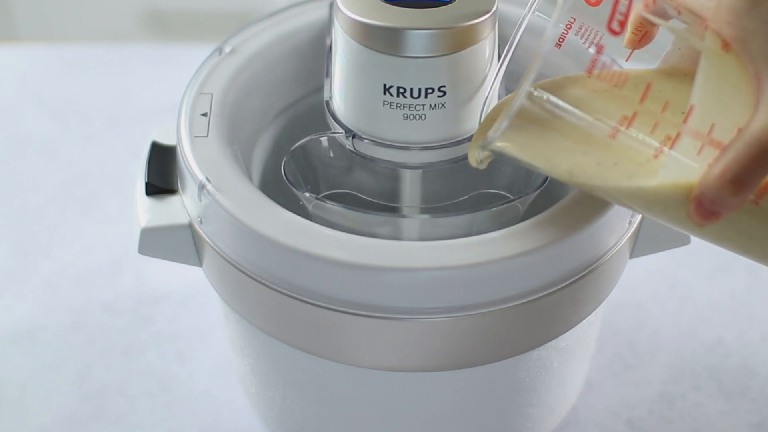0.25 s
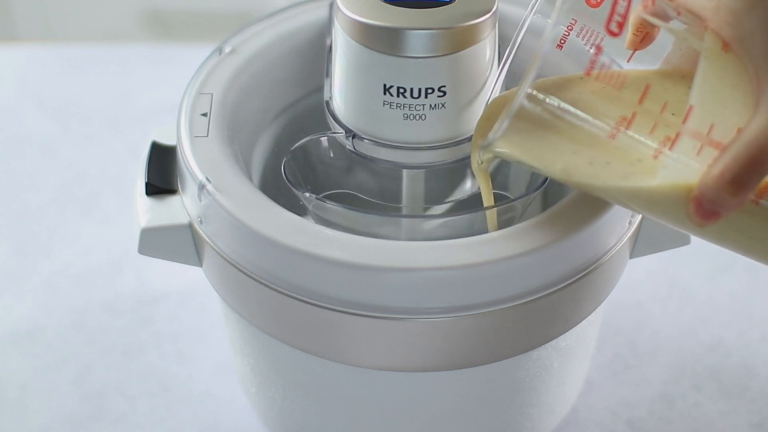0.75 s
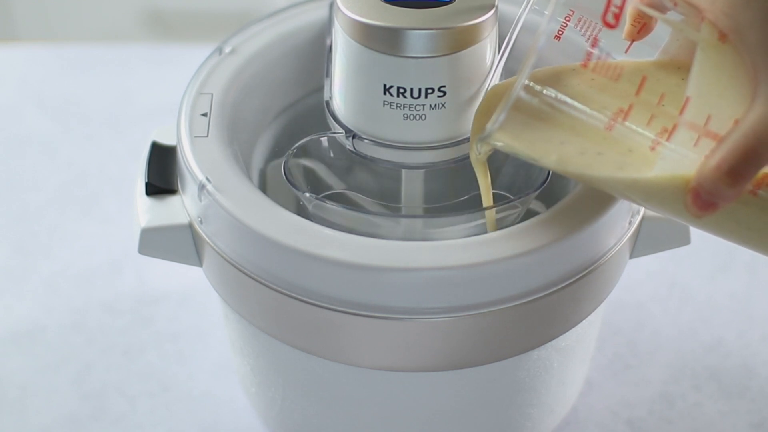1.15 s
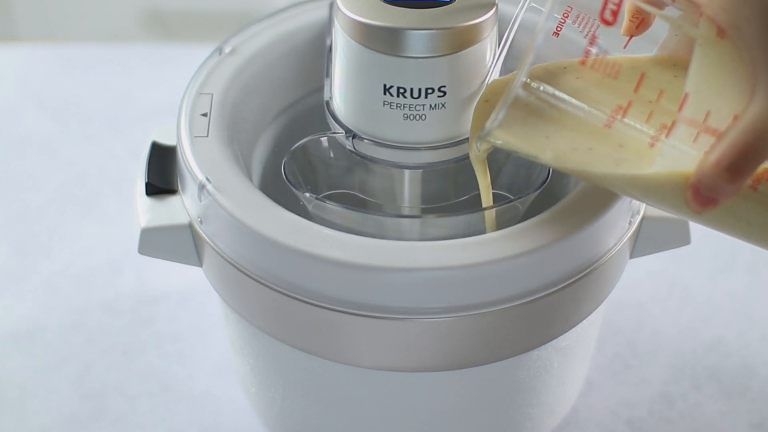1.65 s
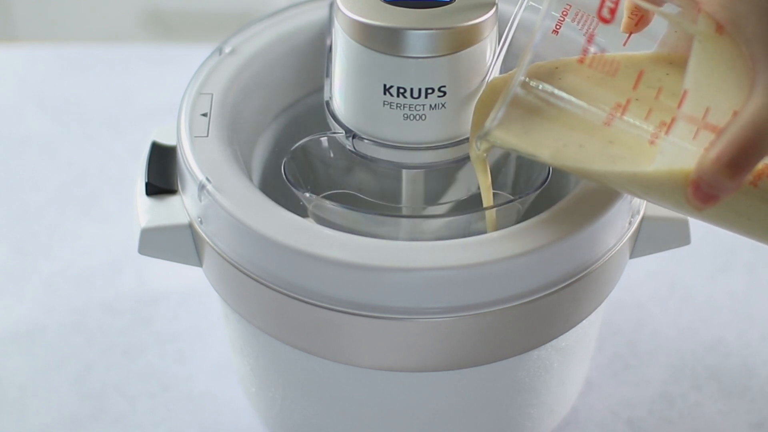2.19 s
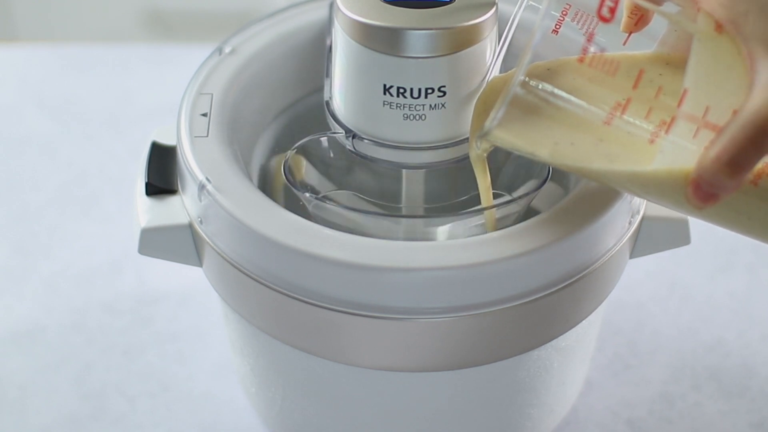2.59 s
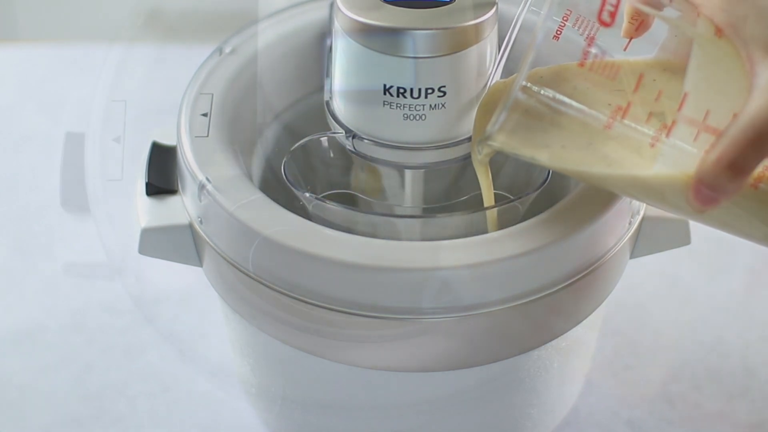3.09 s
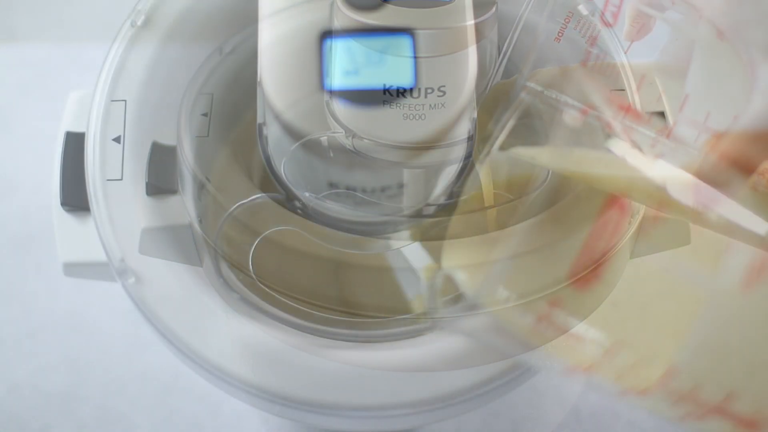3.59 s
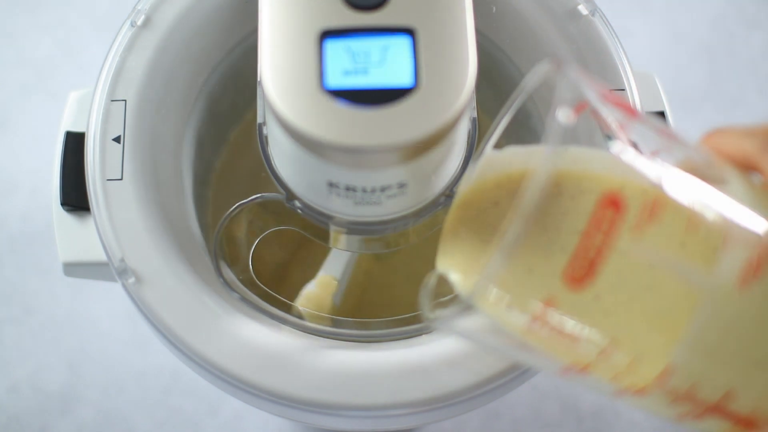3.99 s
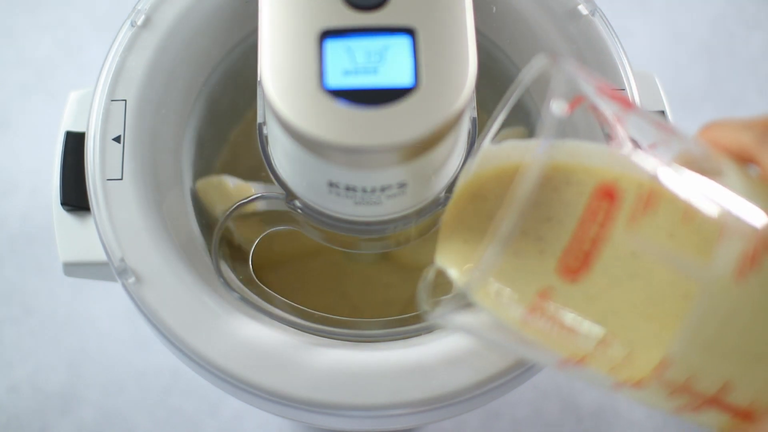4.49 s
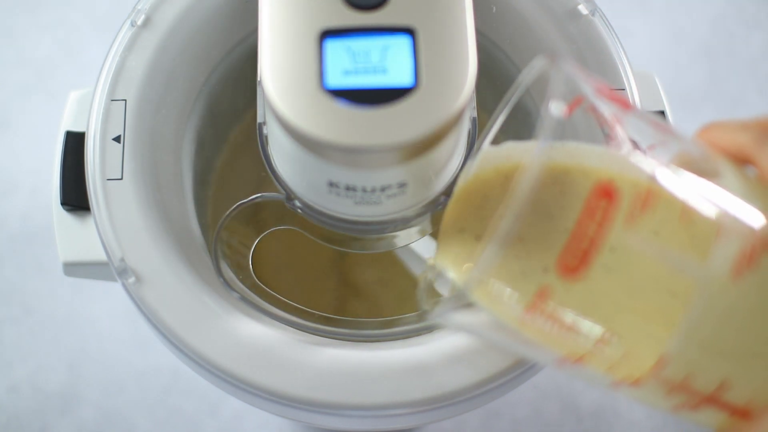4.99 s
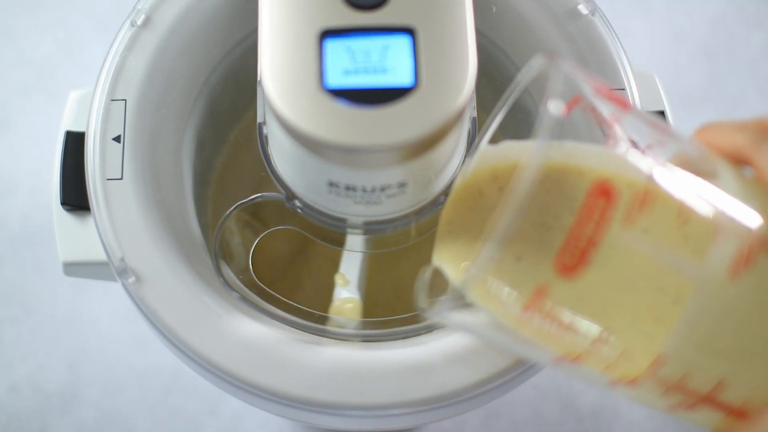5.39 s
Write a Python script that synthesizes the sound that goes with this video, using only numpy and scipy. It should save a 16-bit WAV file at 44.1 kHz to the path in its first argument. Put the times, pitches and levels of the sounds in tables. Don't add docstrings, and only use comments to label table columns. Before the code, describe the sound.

An electric ice cream maker is already running and continues to the end, heard close in mono in a quiet kitchen. A steady hum, strongest around 300 Hz, sits under a grainy plastic gear clatter whose uneven pattern repeats ten times a second. A dull bump comes at 0.5 s; around 1.3 to 1.5 s small lid or jug ticks and a soft table bump bring a brief low buzz. From about 2.1 s the main hum gradually weakens, until a knock at 2.95 s restores it with a slightly different tone. A firmer thud near 3.6 s accompanies a quick change to a quieter moment of the same machine, with softer hum, rounder low knocks each turn and faint deep rumble. Sharp little ticks stand out at 4.2, 4.4, 4.7 and 4.9 s, then a cluster around 5.4 to 5.5 s. After 4.6 s the low knocks soften further. No pouring splash is distinct.

```python
import sys
import numpy as np
from scipy import signal
from scipy.fft import rfft, irfft, next_fast_len
from scipy.io import wavfile
from scipy.ndimage import uniform_filter1d

SR = 44100
rng = np.random.default_rng(int(sys.argv[2]) if len(sys.argv) > 2 else 0)


def magnitude_from_level(level_db):
    exponent = np.asarray(level_db, float) / 20
    return 10 ** exponent


def wrap_up_sound(samples):
    columns = np.atleast_2d(samples).T
    tamed = np.clip(columns, -1, 1)
    steps = np.round(tamed * 32767).astype(np.int16)
    wavfile.write(sys.argv[1], SR, steps)


N = 249165
MAINS_HZ, LATER_MAINS_HZ, POLE_PAIRS = 50, 49.97, 5
SHIFT_S = 2.955
LEAN_S = 1.4

# hz, first_db, shifted_db (after the housing shifts), later_db
HUM_LINES = [(200.0, -56.5, -55.5, -80), (250.0, -60, -51, -66), (300.0, -35.5, -33.5, -43.0),
             (350.0, -51.5, -41.5, -62.5), (400.0, -47.5, -54.5, -61), (500.0, -48, -47.5, -54),
             (550.0, -45.5, -46.5, -55), (600.0, -50.5, -47.5, -62), (650.0, -58.5, -54, -63),
             (700.0, -56, -60.5, -75.5), (750.0, -56.5, -64, -62.5), (850.0, -70, -60.5, -70),
             (900.0, -57, -57, -62.5), (1050.0, -61, -57, -84.5), (1100.0, -54, -71, -67),
             (1150.0, -60, -62.5, -63), (1200.0, -67.5, -78, -66.5), (1400.0, -58.5, -62.5, -82),
             (1500.0, -58, -59.5, -69.5), (1550.0, -65, -58, -72), (1600.0, -61.5, -65, -83),
             (1700.0, -64.5, -69.5, -73), (2050.0, -65.5, -79, -67), (2150.0, -62, -58, -81.5),
             (2250.0, -62.5, -70.5, -80), (2300.0, -73.5, -85, -82.5), (2350.0, -63, -69.5, -77.5),
             (2450.0, -62, -60.5, -68.5), (2500.0, -69.5, -68, -82), (2650.0, -65.5, -67.5, -74.5)]
# hz, first_db, later_db
CLATTER_COLOUR = [(120, -20, -27), (216, -3, -12), (314, 9, 12.5), (370, 9, 8), (467, 4, 8), (557, 4, 3.5),
                  (730, 0, -8.5), (1000, -3.5, -4.5), (1120, -3.5, -4.5), (1300, -3.5, -3.5),
                  (1570, -6, -6), (1800, -8, -1.5), (2100, -6.5, -4), (2320, -6.5, -9), (2500, -6, -6),
                  (2950, -16, -19.5), (3600, -25.5, -20), (4170, -21, -17.5), (4680, -31, -34),
                  (5500, -37, -30.5), (7800, -49.5, -37.5), (10000, -70, -47.5), (15000, -87.5, -57)]
# start_s, peak_db, pitch_hz, t60_s
TABLE_BUMPS = [(.48, -46.5, 70, 0.18), (0.48, -35, 422, 0.12), (1.365, -48, 150, .2), (1.5, -59, 60, .2),
               (2.33, -55, 65, 0.44), (.005, -64, 60, 0.24), (.01, -58, 119, .15), (1.1, -49, 290, .1),
               (1.1, -47, 280, 0.071), (2.589, -49, 149, 0.43), (2.7, -57, 83, 0.5), (3, -43.5, 850, 0.1),
               (2.2, -45, 480, .1), (3.5322, -40.5, 393, 0.21), (3.55, -44, 50, 0.25), (3.54, -46, 85, 0.2),
               (3.6162, -28, 410, 0.13), (2.975, -34, 495, .2), (5.3, -54, 72, .4), (3.87, -57, 75, .3),
               (4.08, -57, 75, .3), (4.95, -58, 80, .3), (4.62, -56, 70, 0.28), (4.4, -65, 50, .3),
               (2.3, -50.5, 130, 0.24), (4.422, -58, 76, 0.37)]


def walk(rate, count=1):
    k = int(SR / rate)
    steps = np.repeat(rng.standard_normal((count, N // k + 1)), k, axis=1)
    return 1.18 * uniform_filter1d(uniform_filter1d(steps, k), k)[:, :N]


def colour(x, hz, db):
    size = next_fast_len(N, True)
    f = np.fft.rfftfreq(size, 1 / SR)
    gain = magnitude_from_level(np.interp(np.log(f + 1), np.log(hz), db))
    return irfft(rfft(x, size) * gain, size)[:N]


def ring(hz, t60):
    t = np.arange(int(t60 * SR)) / SR
    blow = np.sin(np.pi / 2 * np.minimum(t * hz / 3, 1)) ** 2
    return blow * np.sin(2 * np.pi * hz * t) * np.exp(-np.log(1000) * t / t60)


def seat(t):
    # middle_s, depth_db, length_s
    slip_events = [(0.027, -1, 0.16), (0.391, -4.5, 0.027), (0.58, -6.5, 0.08), (0.736, -4, 0.018),
                   (1, -7, 0.016), (1.403, -5, 0.015), (2.053, -4, 0.067), (2.915, -7, 0.034),
                   (3.406, -10, 0.013), (3.508, -12, 0.007), (3.546, 2, .01), (3.568, -4, .01),
                   (3.587, -7, 0.012), (3.757, -9.5, 0.038), (4.78, -1.5, 0.15), (5.25, -0.5, 0.091)]
    slips = sum(db * np.exp(-((t - s) / length) ** 2) for s, db, length in slip_events)
    loose = -34 - 12.5 * np.maximum(t - 2.14, 0)
    seated = -33.5 + 1.5 * (t - SHIFT_S)
    boom_db = uniform_filter1d(np.where(t < SHIFT_S, loose, seated), size=300) + slips
    creep = np.clip(-84 + 19 * (t - 1.8), -84, -64.5)
    lean = 13 * (t > LEAN_S) * np.exp(-(np.maximum(t - LEAN_S, 0) / 0.32) ** 2)
    return boom_db, -41.5 + slips, creep + lean


def jolts(t):
    out = 0
    for s, db, hz, _ in TABLE_BUMPS:
        if hz > 200:
            swing = np.sin(2 * np.pi * 14 * (t - s)) * np.exp(-np.abs(t - s) / 0.062)
            out = out + magnitude_from_level(min(db, -35) + 36.0) * swing
    return out


def hum(mains_hz, line_db, throb, throb_ms, boom_db):
    t = np.arange(N) / SR
    wander, slip = walk(5, count=len(HUM_LINES)), walk(2.5, count=len(HUM_LINES))
    start = rng.standard_normal(len(HUM_LINES))
    jolt = jolts(t)
    turn_rate = 2 * np.pi * mains_hz / POLE_PAIRS
    out = 0
    for k, row in enumerate(HUM_LINES):
        hz = round(row[0] / MAINS_HZ) * mains_hz
        if abs(hz - 300) < 10:
            gain = magnitude_from_level(boom_db + 0.5 * wander[k])
        else:
            gain = magnitude_from_level(line_db[k] + 0.9 * (1 + hz / 1200) * wander[k])
        if hz > 1000:
            swing = np.cos(turn_rate * (t - 0.048) + 0.6 * start[k] + 0.3 * slip[k])
        else:
            swing = np.cos(turn_rate * (t - (throb_ms - 0.15 * (hz - 550)) / 1000))
        depth = 0.2 * (hz > 1000) + throb * np.exp(-((hz - 550) / 120) ** 2)
        late_s = 0.0046 if hz > 430 else -0.0022
        phase = 2 * np.pi * hz * (t - late_s)
        phase = phase - 1.5 * ((hz - 300) / MAINS_HZ) ** 2 * (hz < 430)
        phase += 4 * start[k] * (hz > 620) + 0.2 * start[k] * (1 + hz / 600)
        phase += 0.15 * slip[k] * (1 + hz / 900)
        phase += jolt * (hz < 450)
        out = out + np.sqrt(2) * gain * (1 + depth * swing) * np.cos(phase)
    return out


def each_turn(turn, memory):
    rows = rng.standard_normal((N // turn + 40, turn))
    held = signal.lfilter([np.sqrt(1 - memory ** 2)], [1, -memory], rows, axis=0)
    return held[39:].ravel()[:N]


def snaps(ms, turn_ms, moment):
    # first_middle_db, first_treble_db, later_middle_db, later_treble_db
    pole_pulls = [(4.6, 2.9, 2.7, 2.1), (9.7, 10, 8.8, 8), (10, 7, 6.6, 4.1), (9.8, 4, 4.8, 4),
                  (7, 6.6, 4.9, 8.4), (11.5, 1.9, 4.2, 6), (3.6, 1.8, 6.4, 4.3), (7.4, 2.1, 3.4, 7),
                  (4.8, 5.8, 5, 6.6), (4.6, 9, 3, 6.3)]
    first_pull_ms = 0.8 if moment else 8.3
    out = 0
    for k, row in enumerate(pole_pulls):
        late = ms - first_pull_ms - k * turn_ms / len(pole_pulls)
        late = (late + turn_ms / 2) % turn_ms - turn_ms / 2
        burst = np.exp(-(late / np.where(late < 0, 1.2, 2.2)) ** 2)
        out = out + np.outer(row[2 * moment:][:2], burst)
    return out - out.mean(axis=1, keepdims=True)


def tooth_clatter(turn, tooth_db, memory, surge, moment):
    # hz, share (0-1)
    fresh_share = [(30, 0.9), (200, 0.8), (350, 0.17), (2600, 0.32), (3800, 0.8), (5000, 1), (16000, 1)]
    # from_hz, to_hz, unevenness (0-1), first_surge_share, later_surge_share
    gear_parts = [
        (20, 440, 0.5, -0.45, 0.35),
        (480, 660, 0.3, 1.8, 0.35),
        (730, 1495, 0.25, -0.2, 0.3),
        (1529, 3170, 0.2, -0.8, 0.7),
        (3170, 3520, 0.4, 0.47, -0.18),
        (3790, 4380, 0.8, -0.85, -0.3),
        (4556, 4790, 0.7, -1.7, .3),
        (5030, 13000, 0.6, 0.085, 0.6),
    ]
    hz, share = np.transpose(fresh_share)
    share = np.clip(share, 0.01, 0.99)
    old = colour(each_turn(turn, min(memory, 0.99)), hz, 10 * np.log10(1 - share))
    new = colour(rng.standard_normal(N), hz, 10 * np.log10(share))
    housing = rng.standard_normal(2000) * np.exp(-np.arange(2000) / (0.0072 * SR))
    housing[0] = 14
    both = new + signal.fftconvolve(old, housing / np.sqrt(np.sum(housing ** 2)))[:N]
    from_ms, to_ms, surge_db = surge
    ms = np.arange(N) % turn / SR * 1000
    loaded = uniform_filter1d(1.0 * ((ms > from_ms) & (ms < to_ms)), 250) - 0.5
    snap_db = np.tile(snaps(ms[:turn], turn / SR * 1000, moment), N // turn + 1)[:, :N]
    snap_db = snap_db * (1 + 0.22 * walk(7, count=2))
    out = 0
    for lo_hz, hi_hz, uneven, *load in gear_parts:
        teeth = uniform_filter1d(each_turn(turn, 0.9), 130)
        level_db = uneven * tooth_db * teeth / teeth.std()
        lag = int(0.028 * SR) if 450 < lo_hz < 550 and moment == 0 else 0
        level_db = level_db + load[moment] * surge_db * np.roll(loaded, lag)
        if lo_hz > 700:
            level_db = level_db + (0.85 if lo_hz < 4900 else 0.65) * snap_db[int(lo_hz > 3100)]
        band = colour(both, [lo_hz / 1.15, lo_hz, hi_hz, hi_hz * 1.15], [-60, 0, 0, -60])
        out = out + magnitude_from_level(level_db) * band
    return out


def tooth_knocks(turn, knocks, knock_db):
    starts = np.arange(0, N, turn)
    force = walk(1.1, count=len(knocks))
    out = np.zeros(N)
    for (ms, hz, db, t60_ms), swell in zip(knocks, force):
        follow = 1.0 if hz < 600 else -0.25 * (1300 < hz < 2200)
        uneven_db = hz / 3000 * rng.standard_normal(len(starts))
        blows = np.zeros(N + turn)
        blows[starts + int(ms / 1000 * SR)] = magnitude_from_level(db + 1.5 * swell[starts] + uneven_db + knock_db[starts] * follow)
        out += signal.oaconvolve(blows, ring(hz, t60_ms / 1000))[:N]
    return out


def gears(mains_hz, colour_db, knocks, knock_db, memory, tooth_db, surge, moment):
    turn = round(SR * POLE_PAIRS / mains_hz)
    clatter = tooth_clatter(turn, tooth_db, memory, surge, moment)
    return colour(clatter, np.transpose(CLATTER_COLOUR)[0], colour_db) + tooth_knocks(turn, knocks, knock_db)


def pockets(x, t):
    # middle_s, length_s, pitch_hz, width_ratio, added_db (level of the added band relative to the clatter)
    custard_pockets = [(2.35, 0.26, 1100, 1.04, -1), (3.611, 0.027, 1350, 1.25, 3),
                       (4.65, 0.11, 1900, 1.14, -9), (4.45, 0.35, 1170, 1.06, 1),
                       (4.62, 0.016, 1960, 1.27, 0), (2.85, 0.28, 6100, 1.15, -2),
                       (2.3, 0.25, 3500, 1.08, -7), (4.93, 0.26, 1534, 1.1, 1), (5.35, 0.045, 1440, 1.1, 7),
                       (5.6, 0.055, 1500, 1.08, 2), (1.5, 0.39, 1350, 0.87, -1)]
    out = x
    for s, length, hz, wide, db in custard_pockets:
        edges = [hz / wide / 1.1, hz / wide, hz * wide, hz * wide * 1.2]
        band = colour(x, edges, [-38.5, -5.0, -3.0, -37.5])
        out = out + magnitude_from_level(db) * np.exp(-((t - s) / length) ** 2) * band
    return out


def table_buzz(t, buzz_db, drift_db, moved, later):
    second = np.sqrt(2) * magnitude_from_level(buzz_db * (1 - later) - 88 * later + 2.0 * drift_db)
    third = magnitude_from_level(-67.0 + 9.3 * moved * (1 - later))
    return second * np.cos(4 * np.pi * MAINS_HZ * t) + third * np.cos(6 * np.pi * MAINS_HZ * t)


def background(t, drift_db, later, enter):
    rumble = colour(rng.standard_normal(N), [12, 25, 80, 180, 400], [-21.5, 0.0, 2.5, 4.0, -43.5])
    still = (t > 0.52) & (t < LEAN_S)
    rumble_db = 1.7 * drift_db + uniform_filter1d(np.where(still, -87, -76), size=2000)
    traffic = colour(rng.standard_normal(N), [12, 22, 45, 90], [0.5, 25, 27.5, -31])
    hiss = magnitude_from_level(-96.5 + 3.5 * enter) * rng.standard_normal(N)
    return magnitude_from_level(rumble_db + 24.0) * rumble + magnitude_from_level(-73.5) * later * traffic + hiss


def hits(table, noisy):
    out = np.zeros(N + SR)
    t = np.arange(int(0.3 * SR)) / SR
    for s, db, hz, t60 in table:
        wide = signal.butter(3, [hz / 1.18, min(hz * 1.2, 0.45 * SR)], "bandpass", fs=SR, output="sos")
        splash = rng.standard_normal(len(t)) * np.exp(-np.log(1000) * t / (1.1 * t60))
        wash = signal.sosfilt(wide, splash)
        crack = np.diff(rng.standard_normal(len(t) + 1)) * np.exp(-t / 0.002) * 0.07 * (hz > 6000)
        tone = ring(hz, t60)
        out[int(s * SR):][:len(t)] += magnitude_from_level(db) * (crack + noisy * wash / np.abs(wash).max())
        out[int(s * SR):][:len(tone)] += magnitude_from_level(db) * (1 - noisy) * tone
    return out[:N]


def scene():
    # ms_into_turn, pitch_hz, level_db, t60_ms
    first_knocks = [(16.73, 2800, -46, 12), (57.1, 2300, -48.5, 16), (22.5, 3290, -64.5, 17),
                    (19, 5950, -82.5, 15), (91.5, 4250, -67, 23), (47.4, 4200, -72.5, 15),
                    (27, 2260, -44.5, 45), (99, 4150, -63, 12), (27.5, 5700, -80, 12),
                    (17.06, 400, -43.5, 42), (33, 2230, -47, 25), (54, 2500, -46, 22), (14, 2700, -47, 18),
                    (58, 2700, -49, 16), (80, 2650, -50, 16), (88, 2480, -49, 20), (17, 1500, -47, 20),
                    (35, 1520, -48, 20), (54, 1500, -48, 20), (73, 1510, -47, 20), (37, 2680, -50, 16)]
    later_knocks = [(13.8, 416, -36.5, 105), (52.5, 427, -50, 60), (74, 468, -50, 45),
                    (10.5, 1950, -47, 18), (19.5, 2050, -47, 18), (9.5, 3100, -59, 12),
                    (39.5, 4200, -56, 18), (39, 1170, -48, 30), (17, 1160, -50, 25), (60, 1150, -52, 20),
                    (37, 1930, -51, 16), (70, 4140, -61, 13), (80, 3940, -58, 13), (90, 4100, -60, 13),
                    (10, 3950, -62, 13), (12, 2480, -49, 24), (56, 2440, -49, 26), (40, 5480, -67, 18),
                    (49.5, 7800, -72, 12), (40.5, 7600, -71, 12), (19, 8200, -74, 12),
                    (80.5, 3050, -62, 14), (10, 5520, -74, 12), (19.5, 5450, -74, 12), (50, 5500, -74, 12),
                    (29, 1500, -48, 16), (39, 1550, -50, 14), (48.5, 1480, -50, 16), (57, 1950, -52, 14),
                    (18, 1520, -51, 16)]
    # start_s, peak_db, pitch_hz, t60_s
    tick_events = [(1.183, -51, 2900, 0.028), (1.335, -45, 3070, 0.033), (4.225, -42, 2950, 0.035),
                   (1.305, -71.5, 7800, 0.027), (1.378, -68.5, 11100, .04), (1.388, -78.5, 11600, .04),
                   (4.435, -64, 8400, 0.037), (4.437, -56, 4800, .04), (4.575, -66, 7300, .03),
                   (4.712, -66, 9600, .06), (4.862, -70, 11000, .04), (.42, -62, 4200, .05),
                   (.5, -63, 4400, .05), (5.46, -60, 5500, .08), (5.385, -54, 4100, .03),
                   (1.147, -65, 5220, .02), (1.99, -60, 4600, .03), (2.918, -61, 5800, 0.027),
                   (1.383, -75, 7300, .08), (1.447, -46, 3670, 0.042), (1.71, -50, 4230, 0.047),
                   (2.253, -51, 3930, 0.033), (2.704, -56.5, 7300, 0.045), (2.717, -64, 7700, 0.03),
                   (2.82, -74.5, 14400, 0.05), (2.926, -74, 15000, 0.047), (4.23, -60, 4000, 0.032),
                   (4.433, -39.5, 2950, 0.04), (4.433, -59, 6450, 0.055), (4.649, -57, 6800, 0.057),
                   (4.708, -57.5, 7060, 0.089), (4.86, -54.5, 7100, 0.06), (5.382, -40.5, 2500, 0.073),
                   (5.393, -65, 10000, 0.12), (5.423, -46.5, 7500, 0.04), (5.423, -63, 11000, 0.07),
                   (1.905, -81, 12100, 0.012), (2.15, -81, 12000, 0.032), (2.97, -57, 4600, .03),
                   (2.99, -58, 4400, .04), (3.09, -59, 4200, .04), (3.29, -60, 4200, .04),
                   (3.388, -56, 4200, .05), (3.49, -59, 4300, .04), (3.54, -55, 4200, .05),
                   (2.87, -63, 5600, .02), (2.82, -64, 6000, .03), (3.02, -62, 5500, 0.037),
                   (5.452, -58, 7400, 0.062), (5.49, -46, 4020, 0.057), (5.497, -47, 3600, 0.039)]
    t = np.arange(N) / SR
    boom_db, later_boom_db, buzz_db = seat(t)
    gear_db, drift_db = walk(5.5, count=2)
    moved = np.clip((t - SHIFT_S) / 0.014 + 0.5, 0, 1)
    later = np.clip((t - 3.63) / 0.09 + 0.5, 0, 1)
    enter = np.clip((t - 3.588) / 0.0082, 0, 1)
    thick_db = -8.5 * np.clip((t - 4.6) / 0.28, 0, 1)

    lines = np.transpose(HUM_LINES)
    first_db = lines[1][:, None] * (1 - moved) + lines[2][:, None] * moved
    later_throb_db = 1.6 * np.cos(2 * np.pi * LATER_MAINS_HZ / POLE_PAIRS * (t - 0.075))
    later_boom_db = later_boom_db + 0.53 * thick_db + later_throb_db
    first_hum = hum(MAINS_HZ, first_db, 0.56, 63, boom_db)
    later_hum = hum(LATER_MAINS_HZ, lines[3], 0.38, 22, later_boom_db)

    tones = np.transpose(CLATTER_COLOUR)
    first = gears(MAINS_HZ, tones[1] - 34, first_knocks, 0 * t, memory=0.97, tooth_db=3.6,
                  surge=(10, 70, 1.5), moment=0)
    second = gears(LATER_MAINS_HZ, tones[2] - 40, later_knocks, thick_db, memory=0.878, tooth_db=3.0,
                   surge=(13, 66, 3.5 - 0.16 * thick_db), moment=1)
    first = pockets(first * magnitude_from_level(0.51 * gear_db - 0.37), t) + first_hum
    second = pockets(second * magnitude_from_level(0.22 * gear_db + 2.2 + 0.068 * thick_db), t) + later_hum

    mix = np.cos(later * np.pi / 2) * first + enter * second
    mix += table_buzz(t, buzz_db, drift_db, moved, later)
    mix += background(t, drift_db, later, enter)
    mix += hits(tick_events, 0.65) + hits(TABLE_BUMPS, 0.15)
    return mix[None] * np.minimum(0.65 + t / 0.003, 1)


def roll_off(x):
    return signal.sosfilt(signal.butter(12, 15720, fs=SR, output="sos"), x)


def record(dry):
    return roll_off(dry)


dry = scene()
out = record(dry)
wrap_up_sound(out)
```